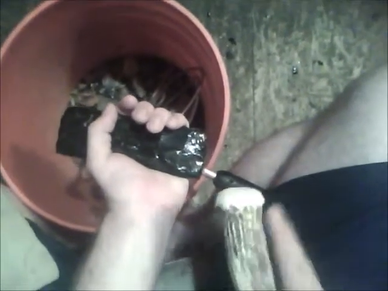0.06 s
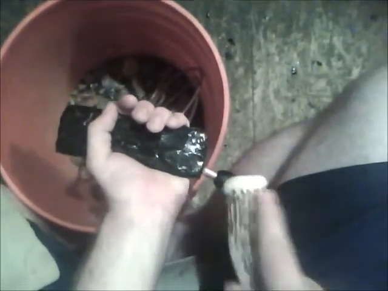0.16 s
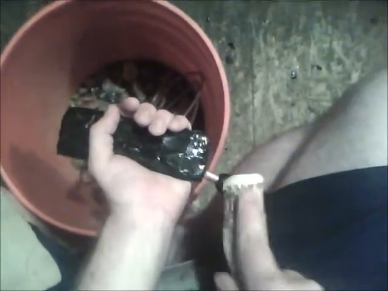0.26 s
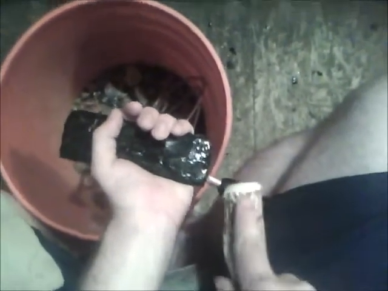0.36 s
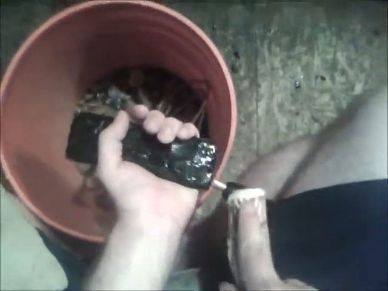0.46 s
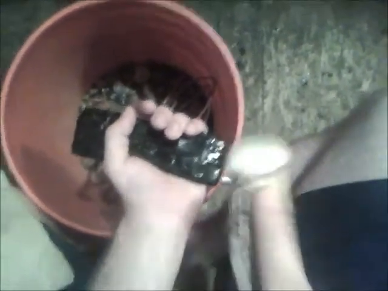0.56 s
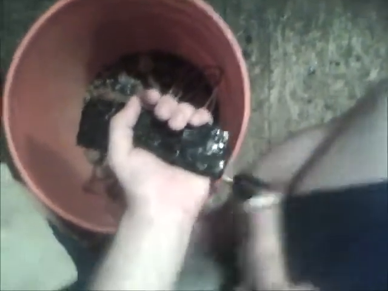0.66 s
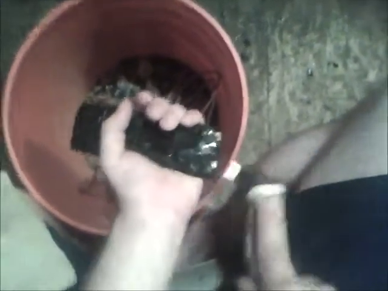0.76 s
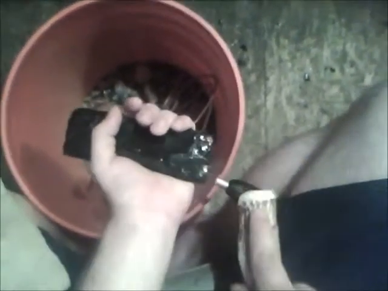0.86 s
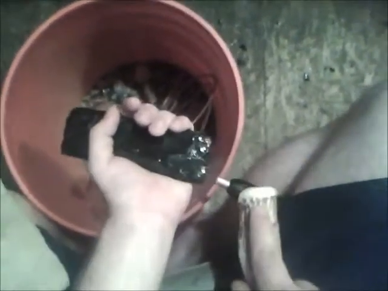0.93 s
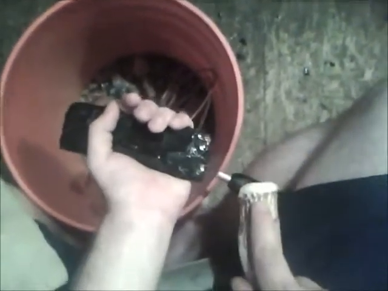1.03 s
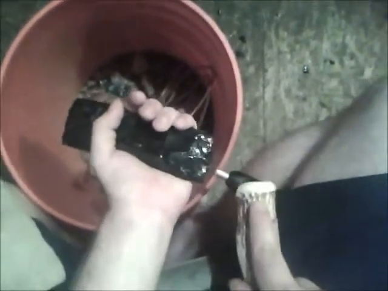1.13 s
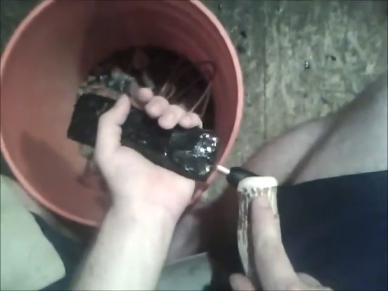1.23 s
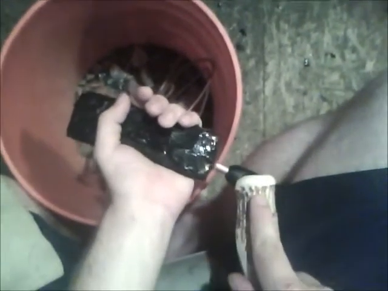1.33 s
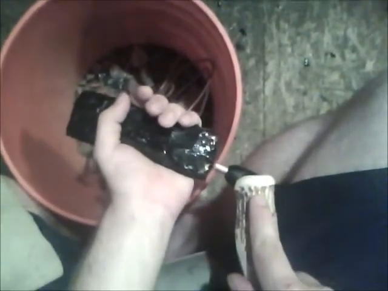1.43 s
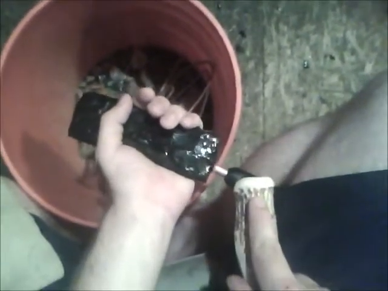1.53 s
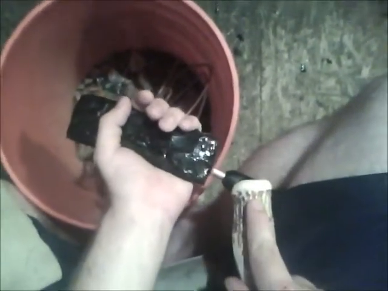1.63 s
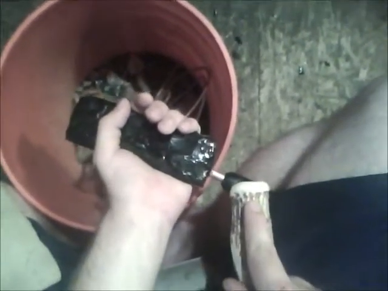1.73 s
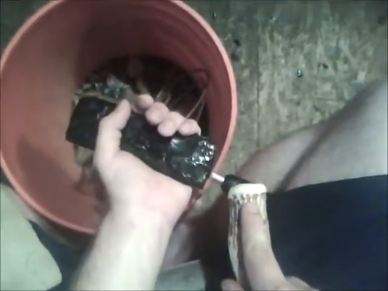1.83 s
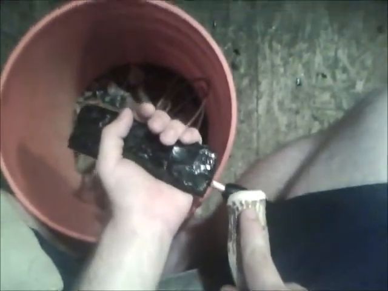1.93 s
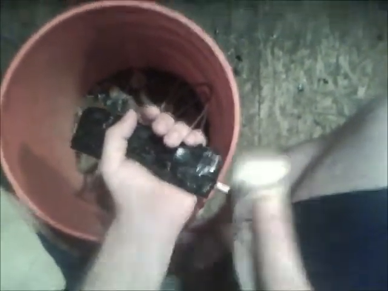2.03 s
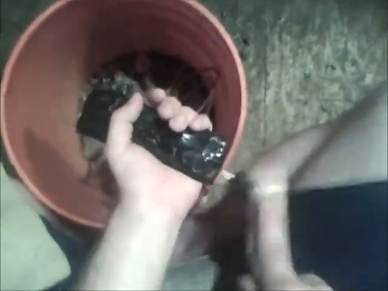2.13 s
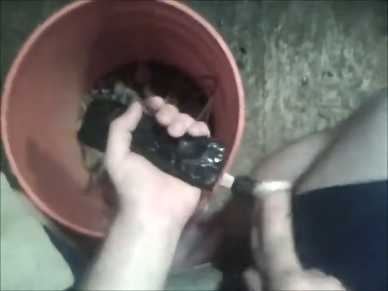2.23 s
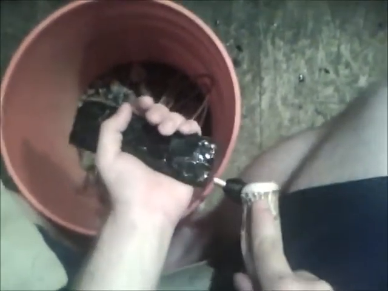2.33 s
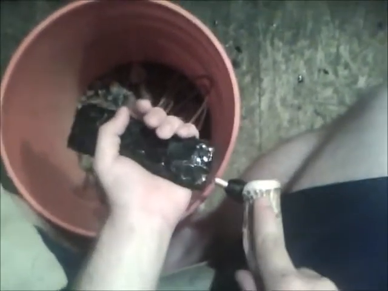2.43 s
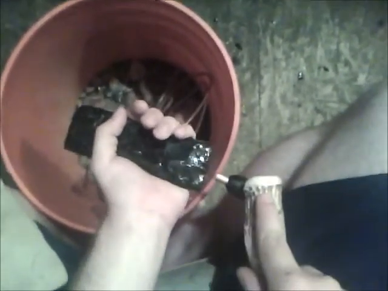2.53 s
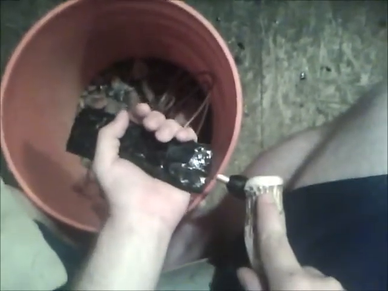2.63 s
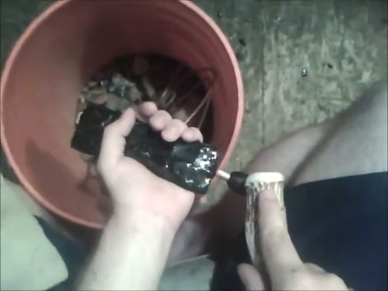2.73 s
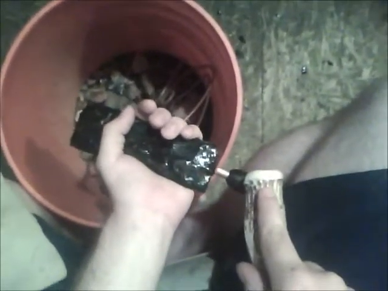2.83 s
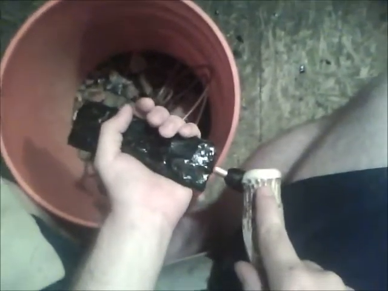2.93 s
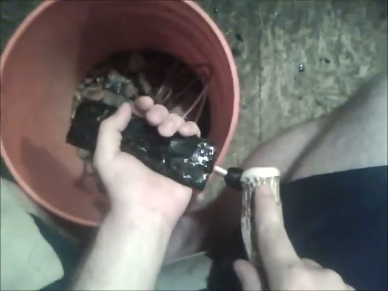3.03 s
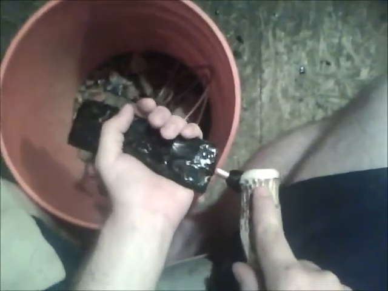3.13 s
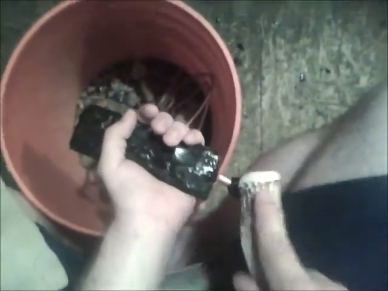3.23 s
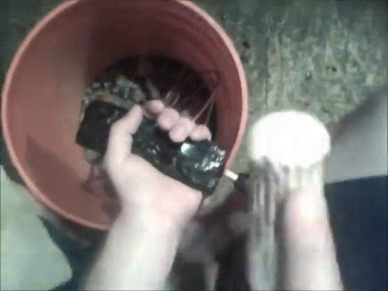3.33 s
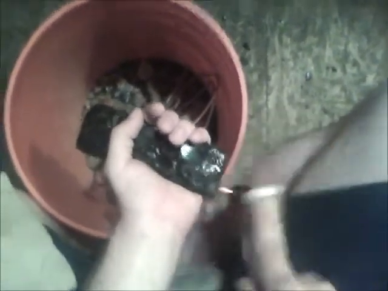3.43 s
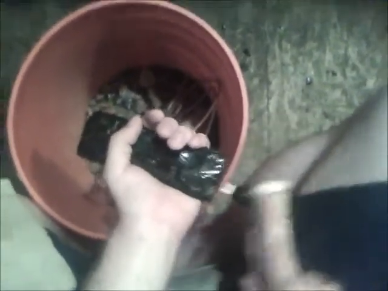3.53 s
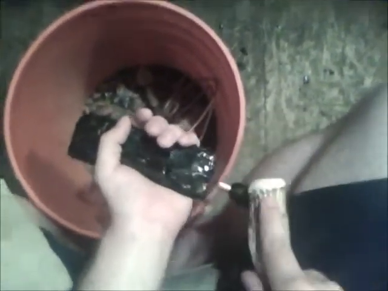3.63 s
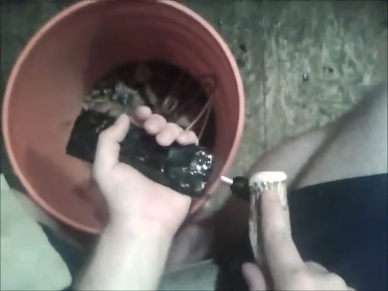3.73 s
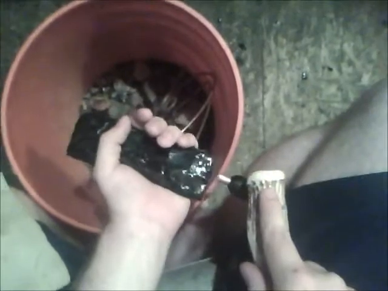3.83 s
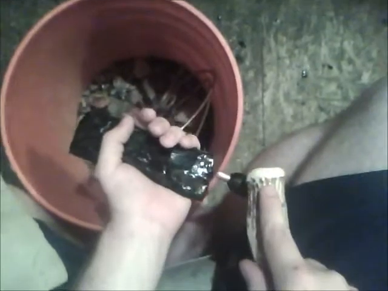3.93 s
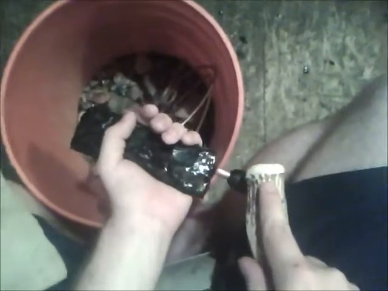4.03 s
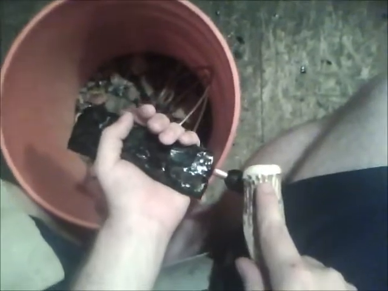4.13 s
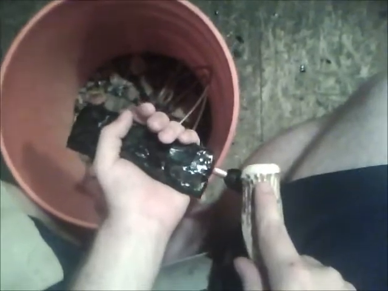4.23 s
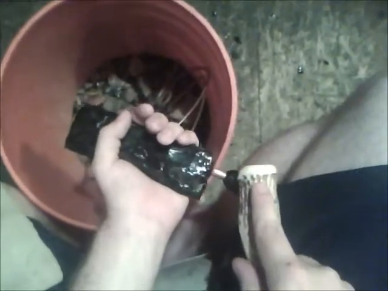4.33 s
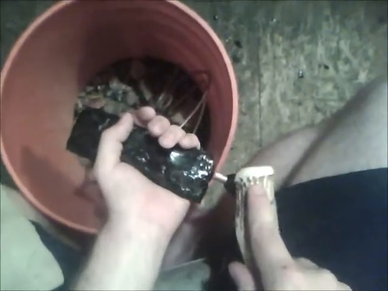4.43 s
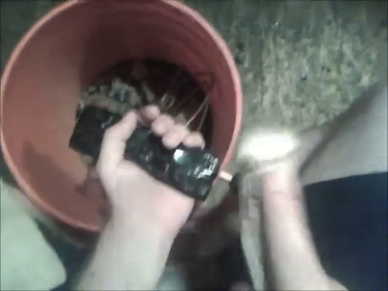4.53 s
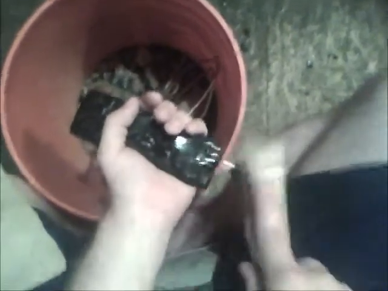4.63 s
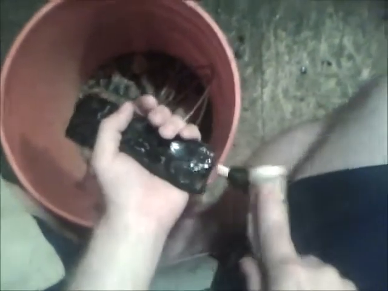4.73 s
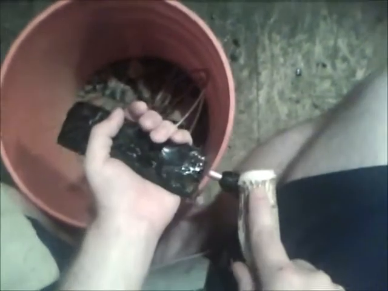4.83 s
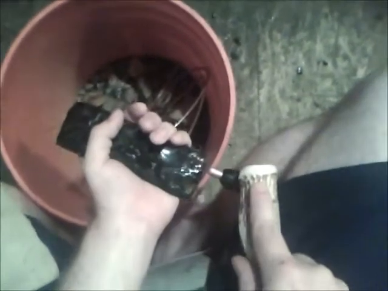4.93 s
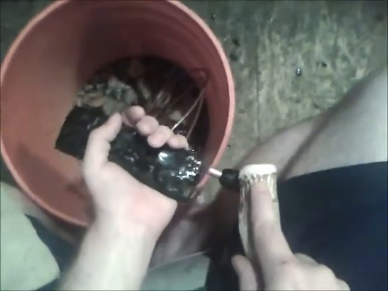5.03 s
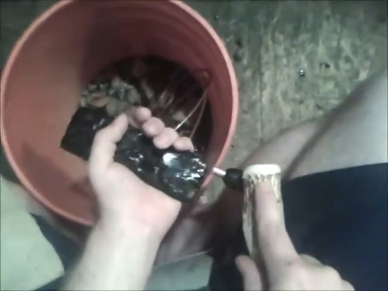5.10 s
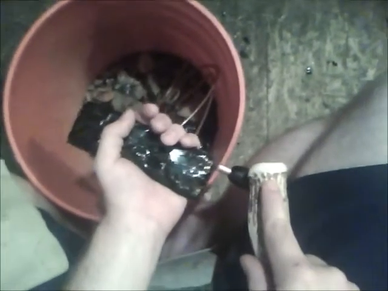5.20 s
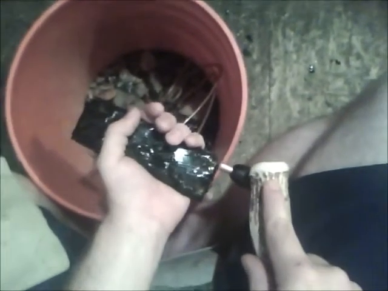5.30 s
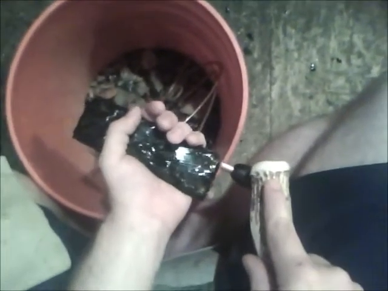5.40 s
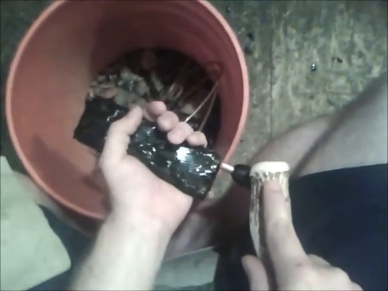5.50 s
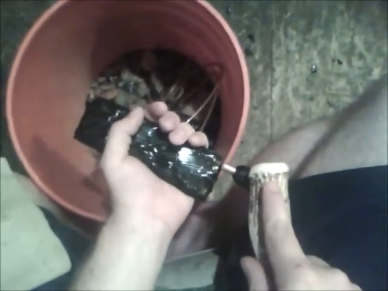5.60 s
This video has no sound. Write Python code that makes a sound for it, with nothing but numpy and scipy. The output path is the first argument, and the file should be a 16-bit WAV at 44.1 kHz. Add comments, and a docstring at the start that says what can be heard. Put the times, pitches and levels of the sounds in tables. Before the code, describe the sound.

A steady, quiet, mostly low room hiss runs throughout, with a barely audible thin high whine. At about 0.6 s an antler hammer hits a metal punch on glassy stone: a hard crack and short bright clink, clipped by the close microphone, dying within a tenth of a second in a small dry workshop. Glassy flakes tinkle until about 1.0 s. Very faint damped taps of antler on punch come at 1.55 and 1.8 s. The second blow, at 2.1 s, has a quick rebound chirp and sparse, fainter debris; another faint tap follows at 2.75 s. The third, strongest blow lands at 3.4 s with a double rebound, then flakes and small plastic bucket knocks at 3.65 and 3.85 s. A light tap comes at 4.1 s; the whine swells briefly near 4.45 s. The fourth blow rings at 4.6 s, with a rebound, bucket knock and tinkling to 4.9 s, then only hiss.

```python
"""Four hard, ringing blows: an antler hammer drives a metal punch on a glassy stone slab in a small workshop.
Each is dying sines for punch and slab under a shaped noise crack, loud enough to clip the microphone input.
Stone flakes (glassy sines plus a tick) and crumbs tinkle down; pieces knock on a plastic bucket.
Between blows the antler touches the punch. Behind lie steady filtered noise and a thin whine that swells once."""
import sys
import numpy as np
from scipy import signal
from scipy.fft import rfft, irfft
from scipy.io import wavfile

SR = 44100
rng = np.random.default_rng(int(sys.argv[2]) if len(sys.argv) > 2 else 0)


def wav_record(signal):
    """Record a signal, one row per channel, as 16-bit PCM in the file named by sys.argv[1]."""
    frames = np.transpose(np.atleast_2d(signal))
    bounded = np.clip(frames, -1, 1)
    # unit amplitude maps onto the largest positive 16-bit level
    quanta = np.round(bounded * 32767).astype(np.int16)
    wavfile.write(sys.argv[1], SR, quanta)


N = 249606  # length in samples
IMPACT_T = np.arange(SR // 2) / SR  # time since an impact, s
HZ = np.fft.rfftfreq(N, 1 / SR)

# the antler seats the punch just ahead of each blow: (t/s, level/dB)
SEATINGS = [(0.6188, -19), (2.1014, -17.5), (3.3833, -11.5), (4.6113, -13)]
# colour of that contact: (f/Hz, relative level/dB)
SEATING_COLOUR = [(60, -21), (300, -7.5), (800, 10.5), (1600, 2), (3000, -5), (6000, -25), (16000, -64)]


def seatings():
    """Antler meets punch without driving it: a soft noise burst centred on the midrange."""
    out = np.zeros(N)
    for start, db in SEATINGS:
        add(out, start, amp(db) * impact(SEATING_COLOUR, near_db=-3.0, room_db=-22))
    return out


# one row a blow: (t/s, punch ring level/dB, punch f/Hz, punch t60/s, overtone level/dB, overtone f/Hz,
# slab ring level/dB, crack level/dB, crack tilt above 2 kHz/dB per octave)
BLOWS = [(0.6250, 7, 1907, 0.065, -4.5, 5280, -1, 5.5, -0.5),
         (2.1110, 10, 1905, 0.083, 6, 5374, -4.5, 7.5, 1), (3.39, 19, 1910, 0.071, 7, 5417, -3, 9, -1.5),
         (4.6189, 15, 1929, .092, 0.5, 5483, -5.5, 7, 1.5)]
# upper modes of the punch: (ratio to overtone f, level against overtone/dB, share of the overtone t60)
PUNCH_UPPER_MODES = [(1, -1, 0.79), (1.05, -11.5, .5), (1.7, -0.5, .35), (1.87, -10.5, .7)]
# modes of the slab and hammer: (f/Hz, relative level/dB, t60/s)
SLAB_MODES = [(1568, -7, .09), (1647, -9, .09), (1716, -9.5, 0.094), (1837, 0, 0.069), (1920, -17, .09),
              (2177, -3.5, .11), (2293, 0.5, 0.044), (2360, 8.5, 0.064), (2410, -9.5, 0.078),
              (5560, -24.5, 0.069)]
# colour of the crack of antler on metal: (f/Hz, relative level/dB)
CRACK_COLOUR = [(30, -24.5), (150, -33), (450, -26.5), (1000, -17.5), (1400, -16.5), (1600, -1.5),
                (2300, -5), (2600, -18.5), (3200, -15), (3900, -10.5), (4600, -15.5), (5500, -9.5),
                (7000, -24.5), (16000, -28.5)]
OVERTONE_SUSTAIN = 1.54  # overtone t60 against that of the lowest punch mode


def blows():
    """The driven punch and slab ring as dying sines while antler on metal cracks as noise."""
    out = np.zeros(N)
    for start, ring_db, hz, t60, overtone_db, overtone_hz, slab_db, crack_db, tilt_db in BLOWS:
        lowest = ring([(hz, ring_db, t60)])
        overtone_t60 = OVERTONE_SUSTAIN * t60
        upper_modes = [(overtone_hz * ratio, overtone_db + db, overtone_t60 * share)
                       for ratio, db, share in PUNCH_UPPER_MODES]
        upper = rattling(ring(upper_modes), rough=0.37, width_hz=110)
        slab = amp(slab_db) * ring(SLAB_MODES)
        crack = amp(crack_db) * impact(CRACK_COLOUR, near_db=4, room_db=-2.5, tilt_db=tilt_db)
        add(out, start, lowest + upper + slab + crack)
    return out


# the punch rebounds on the stone: (t/s, level/dB)
REBOUNDS = [(2.145, -5), (3.415, -6.5), (3.4332, 1), (4.6700, 4.5)]
# colour of the rebound's noise: (f/Hz, relative level/dB)
REBOUND_COLOUR = [(500, -20.5), (2000, -7.5), (3300, -21), (3900, 5), (4500, -21), (5500, -5),
                  (7000, -35.5), (16000, -39.5)]
# ring of the rebound: (f/Hz, relative level/dB, t60/s)
CHIRP_MODES = [(3820, -3, .02), (3977, -8.5, 0.023)]


def rebounds():
    """The punch lands back on the stone: a short uneven chirp with a noise burst."""
    out = np.zeros(N)
    for start, db in REBOUNDS:
        chirp = rattling(ring(CHIRP_MODES), rough=0.48, width_hz=230)
        contact = amp(-2.0) * impact(REBOUND_COLOUR, near_db=-11, room_db=-16)
        add(out, start, amp(db) * (chirp + contact))
    return out


# the antler is laid on the punch between blows: (t/s, low ring level/dB, overtone level/dB)
TAPS = [(1.554, -38, -50), (1.824, -37, -58), (2.7450, -38, -65), (4.104, -32, -64.5)]
# the punch damped by the antler: (f/Hz, relative level/dB, t60/s)
TAP_MODES = [(1653, 2.5, 0.068), (1905, -0.5, 0.072)]
# its overtone: (f/Hz, relative level/dB, t60/s)
TAP_OVERTONE_MODES = [(5370, 0, 0.064)]


def taps():
    """Light contacts ring the damped punch faintly and unevenly."""
    out = np.zeros(N)
    for start, low_db, overtone_db in TAPS:
        tap = amp(low_db) * ring(TAP_MODES) + amp(overtone_db) * ring(TAP_OVERTONE_MODES)
        add(out, start, rattling(tap, rough=.5, width_hz=200))
    return out


# modes of four stone flakes, by name: (f/Hz, relative level/dB, t60 before FLAKE_SUSTAIN/s)
FLAKE_MODES = {"broad": [(6390, -9, 0.077), (9750, -8.5, 0.08), (15300, -1, 0.04)],
               "long": [(11730, 9.5, 0.11), (12800, 12, .06), (15400, 5, .055)],
               "small": [(12850, -2, 0.039), (15550, -6, 0.063)], "thin": [(10200, -9, 0.088),
               (12350, -2, .04), (13480, -11, 0.0375)]}
# the larger flakes land: (t/s, flake name, ring level/dB, contact hardness/dB per mode, tick level/dB)
TINKLES = [(0.685, "broad", -23.5, -9, -23.5), (0.686, "long", -33.5, -12, -36),
           (0.7348, "broad", -24, -3, -28), (0.8672, "long", -35, -4, -40), (0.952, "small", -58, 0, -42),
           (1.0170, "long", -47, -7, -46), (2.2304, "thin", -56, -3, -34.5),
           (2.2642, "broad", -34, -7, -42), (3.457, "thin", -33, 6, -12.5),
           (3.808, "small", -14, -6, -17.5), (3.9095, "small", -36, 4, -34),
           (4.6948, "broad", -23, .5, -16), (4.7636, "thin", -28, -5, -23), (4.8397, "broad", -30, 6, -29),
           (4.9210, "thin", -48, 4, -44)]
CLEAN_RATTLE, CHIP_RATTLE = .2, .6  # roughness of the long flake and of all other pieces


def flakes():
    """The larger flakes land on the chips below; the long flake rings cleanest."""
    out = np.zeros(N)
    for start, flake, ring_db, step_db, tick_db in TINKLES:
        rough = CLEAN_RATTLE if flake == "long" else CHIP_RATTLE
        add(out, start, landing(FLAKE_MODES[flake], ring_db, tick_db, rough, step_db))
    return out


CRUMB_WAIT_S, CRUMB_FALL_S = .06, 0.4  # delay after a blow, then the span of the patter
CRUMB_DB = -37.5  # tick of the loudest crumb at the start of the patter
CRUMB_SPREAD_DB, CRUMB_FADE_DB = 12, 10  # random range of levels; loss over the span
CRUMB_RING_DB = -8  # ring setting against the tick setting
CRUMB_PITCH_SPREAD = .2  # random pitch, independent of loudness: up to this share above the thin flake


def crumbs(count=8):
    """Tiny thin crumbs patter down at random after each blow, later ones fainter on average."""
    out = np.zeros(N)
    for blow in BLOWS:
        for when, softness, pitch in rng.random((count, 3)):
            tick_db = CRUMB_DB - CRUMB_SPREAD_DB * softness - CRUMB_FADE_DB * when
            stretch = 1 + CRUMB_PITCH_SPREAD * pitch
            modes = [(hz * stretch, db, t60) for hz, db, t60 in FLAKE_MODES["thin"]]
            start = blow[0] + CRUMB_WAIT_S + when * CRUMB_FALL_S
            add(out, start, landing(modes, tick_db + CRUMB_RING_DB, tick_db, CHIP_RATTLE))
    return out


# colour of the tick of stone on chips: (f/Hz, relative level/dB)
TICK_COLOUR = [(500, -36), (2500, -13), (4500, -4.5), (6500, -7.5), (8500, -3.5), (12000, -1),
               (16000, -4.5)]
FLAKE_SUSTAIN = 1.6  # stretch of every flake and crumb t60


def landing(modes, ring_db, tick_db, rough, step_db=0):
    """A sharp tick and the glassy ring of a piece of stone."""
    chime = rattling(ring(modes, step_db, FLAKE_SUSTAIN), rough, width_hz=170)
    tick = impact(TICK_COLOUR, near_db=-2, room_db=-12)
    return amp(ring_db) * chime + amp(tick_db) * tick


# pieces knock on the bucket: (t/s, level/dB, tilt above 2 kHz/dB per octave)
KNOCKS = [(3.645, -18, 1), (3.8529, -23, -0.5), (4.713, -19.5, -3.5)]
# colour of a knock on plastic: (f/Hz, relative level/dB)
KNOCK_COLOUR = [(200, -34), (900, -9), (1400, -4), (2000, -2.5), (2800, -13), (4000, -6.5), (6500, -19.5),
                (10000, -22.5), (16000, -46)]
# modes of the bucket wall: (f/Hz, relative level/dB, t60/s)
BUCKET_MODES = [(1350, 0.5, 0.15), (1690, 0.5, 0.13)]


def knocks():
    """A hard tick on plastic with the short, rough ring of the bucket wall."""
    out = np.zeros(N)
    for start, db, tilt_db in KNOCKS:
        wall = amp(-6.0) * rattling(ring(BUCKET_MODES), rough=.9, width_hz=200)
        tick = impact(KNOCK_COLOUR, near_db=0.5, room_db=-8.5, tilt_db=tilt_db)
        add(out, start, amp(db) * (tick + wall))
    return out


# decay of the room: (f/Hz, t60/s)
ROOM_DECAY = [(60, 0.151), (400, 0.13), (2000, 0.15), (5000, 0.11), (10000, 0.13), (16000, 0.11)]


def room_tail():
    """Dense reflections of the small room, each band dying at its own speed."""
    hz, t, bands = signal.stft(rng.standard_normal(len(IMPACT_T)), SR, nperseg=128)
    decay = fade(t, read(ROOM_DECAY, hz)[:, None])
    return signal.istft(bands * decay, SR)[1][:len(IMPACT_T)]


# colour of the room noise: (f/Hz, relative level/dB)
HISS_COLOUR = [(15, -50), (25, -20.5), (59, -13), (82, -26), (104, -10.5), (140, -12.5), (233, -4.5),
               (313, 0.5), (349, -13.5), (567, -6.5), (741, -9.5), (970, -7.5), (2300, -14), (4500, -30.5),
               (15500, -37.5)]
# air resonances in the hiss: (f/Hz, offset at half gain/Hz, level/dB)
DRONES = [(232.8, 12, -55), (328, 14, -61), (614, 73, -56), (926, 120, -52.5)]
HISS_DB = -42  # rms


def hiss():
    """Steady room noise with a few soft resonances, each a narrow noise band."""
    out = amp(HISS_DB) * noise(amp(read(HISS_COLOUR, HZ)))
    for hz, width, db in DRONES:
        out = out + amp(db) * noise(1 / (1 + ((HZ - hz) / width) ** 2))
    return out


WHINE_HZ, WHINE_DB = 6600, -75  # level outside the swell
SWELL_AT_S, SWELL_WIDTH_S, SWELL_DB = 4.46, 0.092, 14.5  # centre, Gaussian width, rise at the centre


def whine():
    """A thin, unsteady sine that swells once."""
    t = np.arange(N) / SR
    swell = SWELL_DB * np.exp(-((t - SWELL_AT_S) / SWELL_WIDTH_S) ** 2)
    tone = rattling(np.sin(2 * np.pi * WHINE_HZ * t), rough=.5, width_hz=40)
    return amp(WHINE_DB + swell) * tone


def ring(modes, step_db=0, length=1):
    """A struck object: dying sines; a harder contact (step_db per mode) favours the later-listed modes."""
    out = np.zeros(len(IMPACT_T))
    for k, (hz, db, t60) in enumerate(modes):
        decay = fade(IMPACT_T, t60 * length)
        out += amp(db + k * step_db) * decay * np.sin(2 * np.pi * hz * IMPACT_T)
    return out


def rattling(x, rough, width_hz):
    """A random flutter of the level makes the ring uneven, which widens its spectral lines."""
    pole = np.exp(-2 * np.pi * width_hz / SR)
    flutter = unit(signal.lfilter([1], [1, -2 * pole, pole ** 2], rng.standard_normal(len(x))))
    return x * (1 + rough * flutter) / np.hypot(1, rough)


def impact(spectrum, near_db, room_db, tilt_db=0):
    """A sharp burst at the contact, scatter from the hand and bucket, then the room."""
    burst = fade(IMPACT_T, .006)
    scatter = amp(near_db) * fade(IMPACT_T, 0.026)
    close = rng.standard_normal(len(IMPACT_T)) * np.hypot(burst, scatter)
    room = amp(room_db) * room_tail() * (1 - fade(IMPACT_T, 0.0063))
    return colour(close + room, spectrum, tilt_db)


def colour(x, spectrum, tilt_db=0):
    """Causal filter of unit power with the given spectrum, tilted per octave above 2 kHz."""
    hz = abs(np.fft.fftfreq(4096, 1 / SR))
    octaves = np.log2(np.maximum(hz / 2000, 1))
    gain = unit(amp(read(spectrum, hz) + tilt_db * octaves))
    # minimum phase: the sound starts at the contact, never before it
    response = np.exp(signal.hilbert(np.log(gain)).conj())
    taps = np.fft.ifft(response).real
    return signal.fftconvolve(x, taps[:len(taps) // 2])[:len(x)]


def noise(gain):
    """Steady noise of rms 1 with the given gain per frequency."""
    return unit(irfft(rfft(rng.standard_normal(N)) * gain, N))


def fade(t, t60):
    """Exponential decay by 60 dB in t60."""
    return np.exp(-np.log(1000) * t / np.maximum(t60, 1e-4))


def amp(db):
    """Decibels to gain."""
    return 10 ** (np.asarray(db) / 20)


def unit(x):
    """Scales to an rms of 1."""
    return x / np.sqrt(np.mean(x ** 2) + 1e-20)


def read(points, hz):
    """Interpolates a table on a log-frequency axis."""
    f, value = np.transpose(points)
    return np.interp(np.log(hz + 1), np.log(f + 1), value)


def add(mix, start, sound):
    """Mixes a sound in at a start time in seconds."""
    part = mix[round(start * SR):][:len(sound)]
    part += sound[:len(part)]


def scene():
    """All sources at one microphone."""
    strikes = seatings() + blows() + rebounds() + taps()
    debris = flakes() + crumbs() + knocks()
    return (strikes + debris + hiss() + whine())[None]


def record(dry):
    """The input clips peaks flat, at double rate to limit aliasing; then a 16 kHz low-pass."""
    fine = signal.resample_poly(dry, 2, 1, axis=1)
    clipped = signal.resample_poly(np.clip(fine, -.97, .97), 1, 2, axis=1)
    low_pass = signal.firwin(255, 16000, window=("kaiser", 8), fs=SR)
    return signal.oaconvolve(clipped, low_pass[None], "same")


dry = scene()
out = record(dry)
wav_record(out)
```